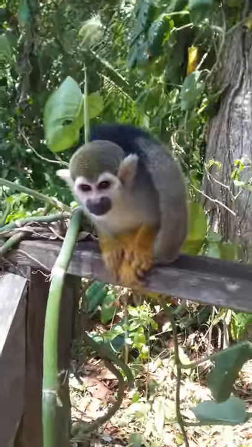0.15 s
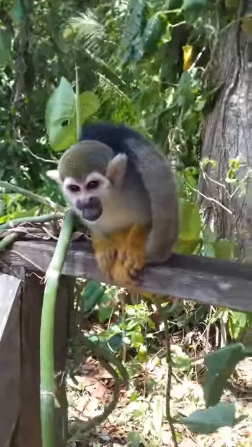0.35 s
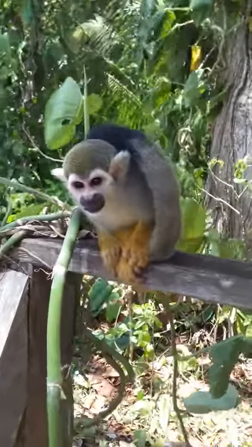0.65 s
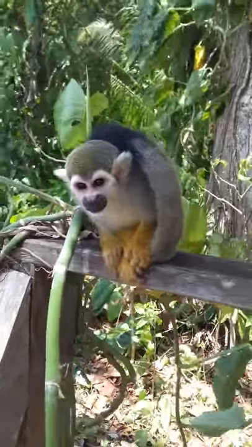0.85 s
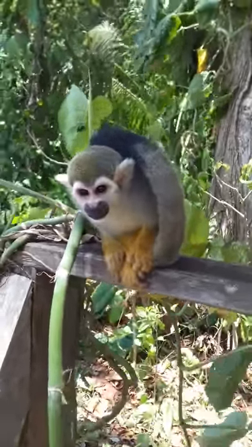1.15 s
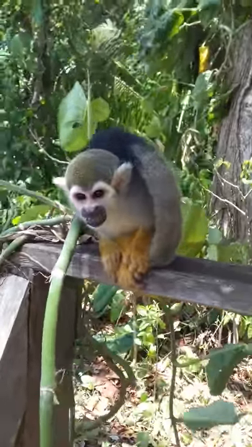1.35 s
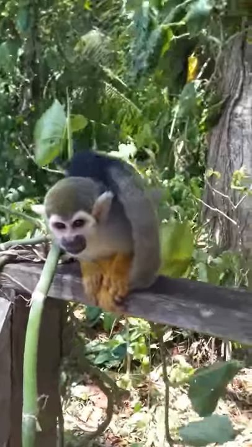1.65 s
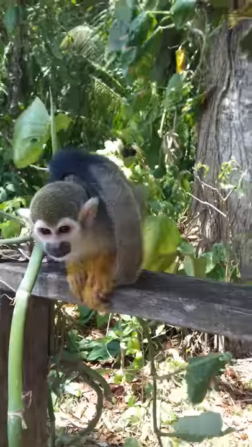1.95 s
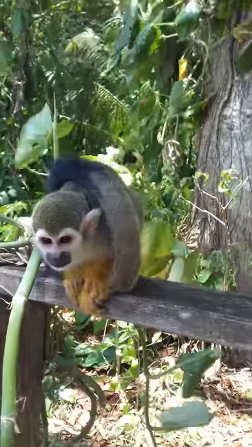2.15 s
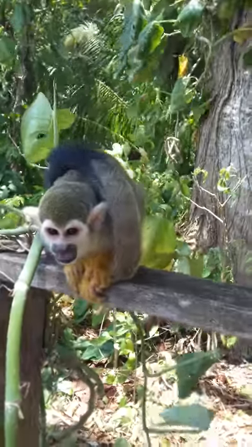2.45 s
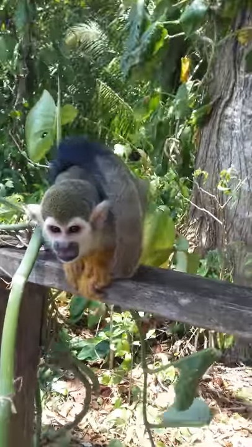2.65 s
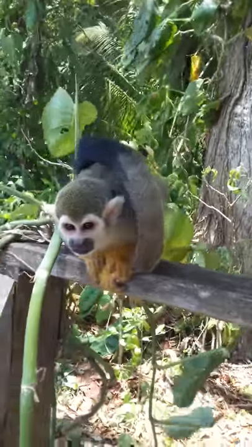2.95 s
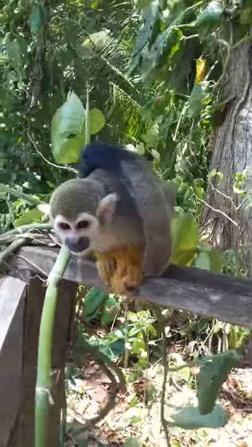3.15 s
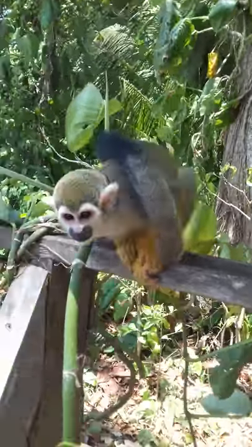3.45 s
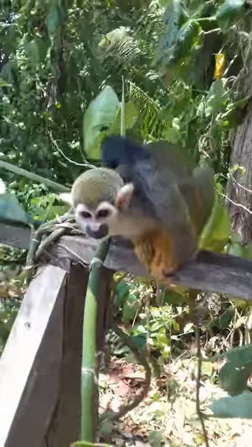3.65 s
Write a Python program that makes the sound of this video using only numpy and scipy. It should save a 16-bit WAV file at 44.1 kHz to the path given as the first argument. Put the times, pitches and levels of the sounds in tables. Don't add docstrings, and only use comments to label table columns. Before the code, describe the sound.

High monkey chirps, first short and isolated, then a loud quick series, with faint answers from trees; strong low wind buffets hit the phone microphone, while insects hiss and leaves tick and rustle behind.

```python
import sys
import numpy as np
from scipy import signal
from scipy.fft import rfft, irfft
from scipy.io import wavfile
from scipy.ndimage import uniform_filter1d

SR = 44100
rng = np.random.default_rng(int(sys.argv[2]) if len(sys.argv) > 2 else 0)


def volts_from_decibels(level):
    exponent = np.asarray(level, float) / 20
    return 10 ** exponent


def inscribe(sig):
    pcm = np.round(np.clip(np.atleast_2d(sig).T, -1, 1) * 32767)
    wavfile.write(sys.argv[1], SR, pcm.astype(np.int16))


N = 167580
T = np.arange(N) / SR
TOP_HZ = 15850

# [f/Hz, level/dB per Hz]
FOREST_SPECTRUM = [(300, 2), (1200, -2.5), (2400, -4.5), (4150, 1.5), (5260, -13), (9210, -30.5),
                   (10000, -33), (11700, -30), (15800, -37.5)]
FOREST_DB, FOREST_FLICKER_DB, SWELL_DB = -43.5, 1.13, .3

# [t/s, peak level/dB, ring f/Hz]
LEAF_TICKS = [(.037, -34.5, 3930), (.321, -38, 3850), (.667, -39.5, 3300), (1.059, -29, 4300),
              (1.136, -45.5, 6430), (1.204, -34, 4000), (1.276, -44, 6120), (1.305, -35.5, 3930),
              (1.404, -33, 3560), (1.739, -31, 4000), (1.811, -40, 3950), (2.203, -32.5, 4400),
              (2.21, -60, 11500), (2.230, -34, 4100), (2.230, -41, 12500), (2.233, -50.5, 12350),
              (2.246, -55.5, 12500), (2.65, -26.5, 3600), (2.972, -36.5, 3660), (3.302, -33, 3600),
              (3.61, -42, 3950)]
TICK_T60_S, TICK_RISE_S, TICK_WIDTH_OCT, TICK_SKIRT_DB = .016, .0012, .3, -37
# [centre t/s, level/dB, length/s]
LEAF_RUSTLES = [
    (.81, -47, 0.034),
    (3.125, -51, .03),
    (3.36, -48.5, 0.048),
    (1.75, -44.5, 0.036),
    (1.968, -34, 0.021),
]
# [f/Hz, level/dB]
RUSTLE_SPECTRUM = [(600, -8), (2300, 0), (4200, -5), (7000, -27), (15800, -45)]
RUSTLE_ROUGH_DB = 2.5

# [centre t/s, level/dB, length/s]
FIRST_GUSTS = [(0.013, -20.5, 0.015), (0.057, -28.5, 0.024), (0.166, -25.5, 0.015), (0.234, -16.5, 0.012),
               (0.3, -23, 0.064), (0.362, -18.5, 0.045), (0.405, -20, 0.031), (0.446, -23.5, 0.02),
               (0.55, -18, 0.029), (0.617, -24, 0.11), (0.656, -29, 0.023), (0.712, -24.5, 0.034),
               (0.775, -22, 0.0074), (0.834, -19.5, 0.021), (0.864, -10, 0.021), (0.928, -16.5, 0.067),
               (1.02, -20, 0.016), (1.124, -10.5, 0.015), (1.193, -20, 0.069), (1.253, -19.5, 0.035),
               (1.304, -22, 0.033), (1.335, -25.5, 0.024), (1.418, -9, 0.035), (1.488, -12.5, 0.03),
               (1.566, -21, 0.056), (1.606, -19, 0.014), (1.679, -19.5, 0.055), (1.821, -18, 0.06),
               (1.888, -16.5, 0.02)]
# [centre t/s, level/dB, length/s]
LAST_GUSTS = [(1.954, -13.5, 0.048), (2.053, -12, 0.019), (2.093, -19, 0.02), (2.123, -11, 0.011),
              (2.261, -22.5, 0.012), (2.287, -14.5, 0.0066), (2.375, -8, 0.016), (2.409, -13, 0.046),
              (2.477, -17, 0.028), (2.531, -14.5, 0.022), (2.608, -34, 0.074), (2.638, -41, 0.02),
              (2.68, -26, 0.0078), (2.839, -28.5, 0.055), (2.937, -24.5, 0.022), (3.012, -26, 0.061),
              (3.081, -14.5, 0.014), (3.125, -24, 0.029), (3.221, -17.5, 0.048), (3.277, -10.5, 0.013),
              (3.313, -17.5, 0.043), (3.377, -21.5, 0.013), (3.485, -29, 0.038), (3.531, -12.5, 0.012),
              (3.587, -26.5, 0.047), (3.64, -27.5, 0.0091), (3.675, -24.5, 0.0087), (3.769, -28, 0.011)]
# [centre t/s, level/dB, length/s]
MORE_GUSTS = [(1.6, -13, 0.016), (1.752, -21.5, 0.048), (2.345, -12.5, 0.03), (2.336, -15, .008),
              (1.94, -17, .02), (1.395, -17, .014), (2.165, -25.5, 0.049), (1.085, -25.5, 0.032),
              (3.797, -26.5, 0.0083), (0.1, -34.5, .04), (2.88, -28, 0.043), (2.795, -30, 0.013),
              (2.245, -25, 0.014), (3.192, -21, .012)]
# [f/Hz, level/dB]
WIND_SPECTRUM = [(30, -39), (60, -10), (130, 0), (250, -2), (500, -7), (1000, -26.5), (2000, -36.5),
                 (4000, -50)]
BREEZE_DB, WIND_DB, GUST_REF_DB = -41.5, -7, -4.5
EDDIES_PER_S, EDDY_SCATTER_DB, EDDY_CYCLES, SWIRL_SHARE = 450, 5, .43, .36
EVEN_S = .014
BRIGHTEN, BASS_EVEN = .34, .06
OWN_SHARE, LAG_CYCLES = .65, 3.5
# [t/s, peak level/dB, sharpness/octaves]
AIR_SLAPS = [(0.233, -23.5, -1.16), (.292, -25, -1.2), (.342, -20, -1.03), (.4, -23.5, -1.2),
             (.568, -26.5, -0.58), (.860, -17, -0.45), (.921, -17, -1.1), (.952, -22, -0.55),
             (1.004, -25, -0.66), (1.122, -8, -0.75), (1.1343, -14, -0.17), (1.389, -19, -1.2),
             (1.4042, -6, 0.083), (1.413, -7, -0.75), (1.4307, -4, 0.029), (1.446, -18, -.7),
             (1.478, -9, -0.64), (1.499, -12, -1.1), (1.551, -22.5, -0.63), (1.604, -29, -.9),
             (1.677, -24.5, -0.71), (1.753, -22, -0.25), (1.941, -11, -0.32), (2.05, -17, -0.21),
             (2.095, -18, -.3), (2.122, -11, -0.72), (2.283, -26, -1.1), (2.340, -24, -.4), (2.376, -5, .3),
             (2.399, -7, -0.37), (2.418, -9.5, -0.23), (2.487, -25, -1.1), (2.519, -19.5, -0.4),
             (2.531, -20, -.7), (3.076, -22, -.4), (3.082, -19, -.7), (3.214, -17.5, -1.1),
             (3.222, -10, -1.4), (3.277, -13.5, -1.35), (3.301, -22, -1.1), (3.520, -16, -1.1),
             (3.527, -19, -0.35), (3.537, -14.5, -1.15)]
SLAP_HZ, SLAP_CYCLES, SLAP_DB = 894, .61, -2
PORT_HZ, PORT_LIMIT = 4000, .95

# (start t/s, length/s, level/dB, from f/Hz, to f/Hz)
DOVE_HOOT = (.03, .1, -37, 645, 620)
# [start t/s, length/s, peak level/dB, from f/Hz, to f/Hz]
FAR_WHISTLES = [
    (2.103, .105, -53, 5850, 8300),
    (3.336, .04, -48, 4700, 8050),
]
FAR_SLIDE_S, FAR_FADE_DB, FAR_ARCH_HZ, FAR_PEAK_S = .018, -24, 450, .055
LEAF_ECHO_DB, LEAF_ECHO_T60_S, TREES_DB, TREES_T60_S = -12, .045, -28, .25

# [t/s, f/Hz, peak level/dB]
HOOKED_CHIRPS = [
    [(.518, 5530, -56), (.524, 5373, -16.5), (.533, 5400, -15), (.541, 5600, -17), (.547, 5920, -18),
     (.551, 6300, -42)],
    [(2.576, 6300, -41), (2.580, 5900, -12), (2.584, 5580, -12), (2.593, 5610, -10.5), (2.601, 5750, -13.5),
     (2.612, 6150, -13), (2.620, 6660, -18), (2.626, 7700, -30), (2.632, 8050, -50)],
    [(2.677, 6380, -53), (2.681, 5770, -8), (2.688, 5370, -12), (2.695, 5184, -7), (2.706, 5540, -7.5),
     (2.718, 6270, -13), (2.724, 7100, -19), (2.730, 7900, -30), (2.738, 8200, -43)],
]
# [start t/s, length/s, peak level/dB, from
# f/Hz, to f/Hz]
SHORT_PEEPS = [(1.506, .038, -14.5, 5260, 6490), (1.674, 0.014, -18, 5410, 6350),
               (2.492, 0.017, -25.5, 6620, 7080), (2.504, 0.011, -22, 6850, 7250),
               (2.513, .039, -22, 7850, 9350), (2.808, .021, -24, 4270, 4230),
               (3.334, .02, -32, 4100, 4250), (3.353, .016, -36, 4000, 4150),
               (2.827, 0.018, -10.5, 4700, 6450), (3.245, 0.023, -47, 6050, 6150),
               (3.252, .014, -58, 6440, 7100), (3.333, .03, -71, 12300, 11700)]
PEEP_BEND, PEEP_EDGE_S, PEEP_FADE_DB, EDGE_DB = .85, .008, -6, -30
OCTAVE_DB, THIRD_DB, OVERTONE_GROWTH, OVERTONE_DB_PER_KHZ = -27, -46, .65, -3.5
WOBBLE_DB, WOBBLE_PER_S = 1.5, 250

NOTCH_HZ, NOTCH_WIDTH_HZ, NOTCH_SHARE = 9920, 180, .75
OFFSET = -.0007


def unit(x):
    return x / np.sqrt(np.mean(x ** 2))


def curve(table, hz):
    points_hz, points_db = np.array(table).T
    return np.interp(np.log(hz + 1e-9), np.log(points_hz), points_db)


def colour(x, table):
    return irfft(rfft(x) * volts_from_decibels(curve(table, np.arange(N // 2 + 1) * SR / N)), N)


def smooth_twice(x, k):
    return uniform_filter1d(uniform_filter1d(x, k), k)


def walk(rate):
    k = int(SR / rate)
    held = np.repeat(rng.standard_normal(N // k + 1), k)
    return unit(smooth_twice(held, k)[:N])


def bumps(rows):
    return sum(volts_from_decibels(2 * db) * np.exp(-(2 * (T - s) / length) ** 2) for s, db, length in rows)


def forest():
    spectrum = rfft(unit(colour(rng.standard_normal(N), FOREST_SPECTRUM)))
    f = np.arange(N // 2 + 1) * SR / N
    swell, out = walk(1.9), 0
    edges_hz = [0, 1000, 2000, 3000, 4000, 5000, 7000, 10000, SR]
    for lo, hi in zip(edges_hz, edges_hz[1:]):
        band = irfft(spectrum * (f >= lo) * (f < hi), N)
        out = out + volts_from_decibels(SWELL_DB * swell + FOREST_FLICKER_DB * walk(30.1)) * band
    return volts_from_decibels(FOREST_DB) * out


def leaf_rustles():
    hiss = unit(colour(rng.standard_normal(N), RUSTLE_SPECTRUM))
    return np.sqrt(bumps(LEAF_RUSTLES)) * volts_from_decibels(RUSTLE_ROUGH_DB * walk(440)) * hiss


def leaf_ticks():
    out, t = np.zeros(N), T[:1024]
    f = np.arange(1, 514) * SR / 1024
    for s, db, hz in LEAF_TICKS:
        ring = np.exp(-.5 * (np.log2(f / hz) / TICK_WIDTH_OCT) ** 2) + volts_from_decibels(TICK_SKIRT_DB) * (f > hz / 3)
        burst = unit(irfft(rfft(rng.standard_normal(1024)) * ring))
        envelope = volts_from_decibels(db - 60 * t / TICK_T60_S) * np.minimum(t / TICK_RISE_S, 1) ** 2
        out[int(s * SR):][:1024] += envelope * burst
    return out


def wavelet(hz, cycles):
    t = np.arange(-2048, 2049) / SR
    return np.sin(2 * np.pi * hz * t + .47) * np.exp(-.5 * (t * hz / cycles) ** 2)


def eddies():
    hit = rng.random(N) < EDDIES_PER_S / SR
    size = np.minimum(rng.exponential(size=N), 3)
    sign = np.sign(rng.standard_normal(N))
    knocks = unit(hit * volts_from_decibels(EDDY_SCATTER_DB * size) * sign) + SWIRL_SHARE * rng.standard_normal(N)
    return knocks / np.sqrt(smooth_twice(knocks ** 2, int(EVEN_S * SR)))


def buffets():
    gust = volts_from_decibels(2 * BREEZE_DB) + bumps(list(FIRST_GUSTS) + list(LAST_GUSTS) + list(MORE_GUSTS))
    shared, out = eddies(), 0
    for hz in 45 * 2 ** np.arange(0, 6.6, .75):
        gust_db = 10 * np.log10(uniform_filter1d(gust, 1 + int(LAG_CYCLES * SR / hz)))
        octaves = np.log2(hz / 200)
        tilt = octaves * (BRIGHTEN if octaves > 0 else BASS_EVEN)
        db = curve(WIND_SPECTRUM, hz) + 10 * np.log10(hz / 130) + gust_db + tilt * (gust_db - GUST_REF_DB)
        own = min(OWN_SHARE * np.sqrt(250 / hz), 1)
        knocks = (1 - own) * shared + own * np.roll(shared, int(hz) * 37)
        out = out + volts_from_decibels(db) * unit(signal.fftconvolve(knocks, wavelet(hz, EDDY_CYCLES), "same"))
    return volts_from_decibels(WIND_DB) * out


def air_slaps():
    out = np.zeros(N)
    for s, db, sharp in AIR_SLAPS:
        hz, i = SLAP_HZ * 2 ** sharp, int((s + .001) * SR)
        slap = wavelet(hz, SLAP_CYCLES)
        slap = slap + .5 * wavelet(2.02 * hz, SLAP_CYCLES) + .74 * wavelet(hz / 1.8, SLAP_CYCLES)
        sign = np.sign(rng.standard_normal())
        out[i - len(slap) // 2:][:len(slap)] += volts_from_decibels(db + SLAP_DB) * sign * slap
    return out


def wind_at_port():
    limited = PORT_LIMIT * np.tanh((buffets() + air_slaps()) / PORT_LIMIT)
    return signal.sosfilt(signal.butter(4, PORT_HZ, fs=SR, output="sos"), limited)


def whistle(hz, db, rich=True):
    out, on = np.zeros(N), db > -110
    hz, db = hz[on], db[on]
    phase = 2 * np.pi * np.cumsum(hz) / SR
    over = volts_from_decibels(OCTAVE_DB) * np.sin(2 * phase) + volts_from_decibels(THIRD_DB) * np.sin(3 * phase) * (3 * hz < TOP_HZ)
    effort = volts_from_decibels(OVERTONE_GROWTH * (db + 9.5) + OVERTONE_DB_PER_KHZ * np.abs(hz - 5500) / 1000)
    out[on] = volts_from_decibels(db) * (np.sin(phase) + rich * effort * over)
    return out


def glide(row, bend, edge_s, fade_db, rich=True):
    s, length, db, from_hz, to_hz = row
    shape = np.interp(T - s, [-.002, 0, edge_s, length - edge_s / 2, length, length + .002],
                      [-120, EDGE_DB, 0, fade_db, EDGE_DB, -120])
    return whistle(from_hz + (to_hz - from_hz) * bend, db + uniform_filter1d(shape, 80), rich)


def far_dove():
    s, length = DOVE_HOOT[:2]
    return glide(DOVE_HOOT, np.clip((T - s) / length, 0, 1), .04, -9, False)


def far_monkeys():
    out = 0
    for row in FAR_WHISTLES:
        t, span_hz = T - row[0], row[4] - row[3]
        slide = np.tanh((np.clip(t, 0, 1) / FAR_SLIDE_S) ** 2)
        arch = FAR_ARCH_HZ * (t / FAR_PEAK_S - 1) ** 2 / span_hz
        out = out + glide(row, slide - arch, .003, FAR_FADE_DB, False) * volts_from_decibels(4 * walk(200))
    return out


def foliage_echo(calls):
    t, echo = T[:SR // 3], 0
    for t60, db in ((LEAF_ECHO_T60_S, LEAF_ECHO_DB), (TREES_T60_S, TREES_DB)):
        decay = volts_from_decibels(db - 60 * t / t60) * np.sqrt(2 * np.log(1000) / t60 / SR)
        echo = echo + decay * rng.standard_normal(len(t)) * np.clip(t / .003 - .4, 0, 1)
    return signal.fftconvolve(calls, echo)[:N]


def near_monkey():
    out = 0
    for chirp in HOOKED_CHIRPS:
        s, hz, db = np.array(chirp).T
        pitch = uniform_filter1d(np.interp(T, s, hz), 130)
        level = uniform_filter1d(np.interp(T, s, db, left=-112, right=-112), 130)
        out = out + whistle(pitch, level)
    for row in SHORT_PEEPS:
        bend = np.clip((T - row[0]) / row[1], 0, 1) ** PEEP_BEND
        out = out + glide(row, bend, min(PEEP_EDGE_S, row[1] / 3.2), PEEP_FADE_DB)
    return out * volts_from_decibels(WOBBLE_DB * walk(WOBBLE_PER_S))


def scene():
    far, near = far_monkeys(), near_monkey()
    calls = far_dove() + far + near + foliage_echo(near + 5 * far)
    return (forest() + leaf_rustles() + leaf_ticks() + wind_at_port() + calls)[None]


def low_pass(x):
    return signal.sosfilt(signal.butter(12, 15950, fs=SR, output="sos"), x)


def record(dry):
    x = signal.sosfilt(signal.butter(2, 45, "high", fs=SR, output="sos"), dry)
    f = np.arange(N // 2 + 1) * SR / N
    dip = 1 - NOTCH_SHARE * np.exp(-.5 * ((f - NOTCH_HZ) / NOTCH_WIDTH_HZ) ** 2)
    mix = irfft(rfft(x) * dip * (f < TOP_HZ), N) + OFFSET
    return low_pass(mix)


dry = scene()
out = record(dry)
inscribe(out)
```